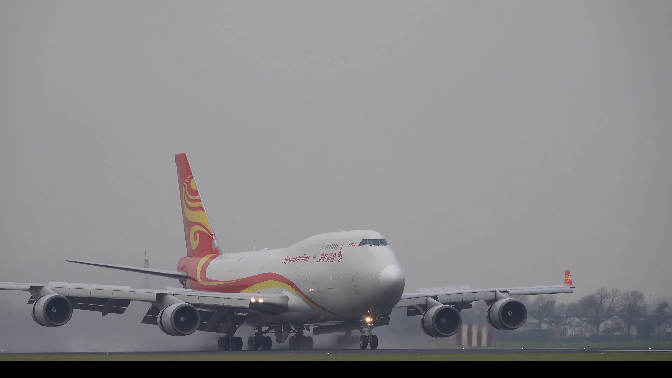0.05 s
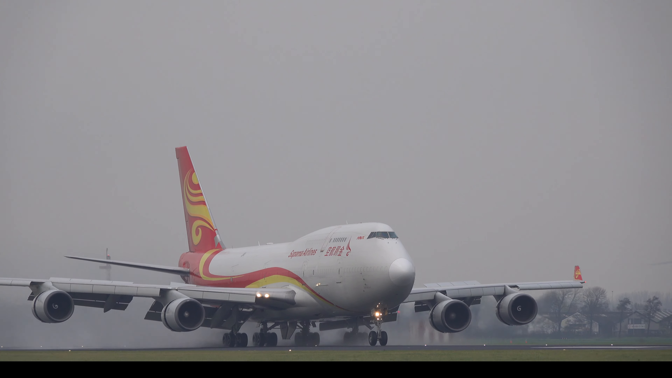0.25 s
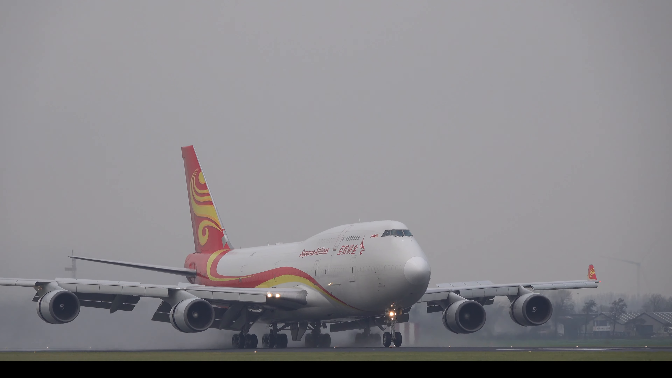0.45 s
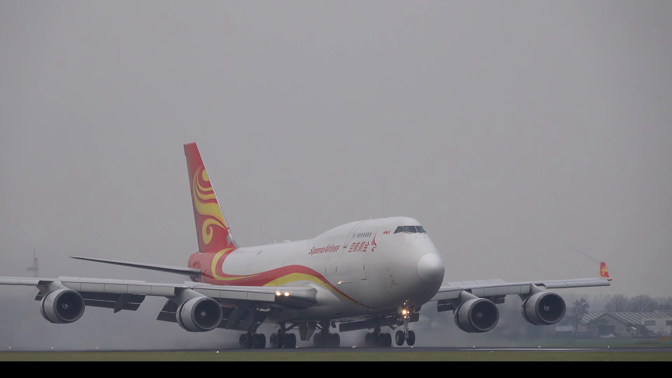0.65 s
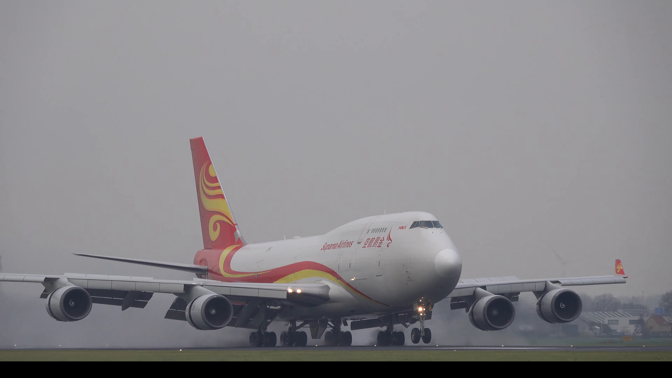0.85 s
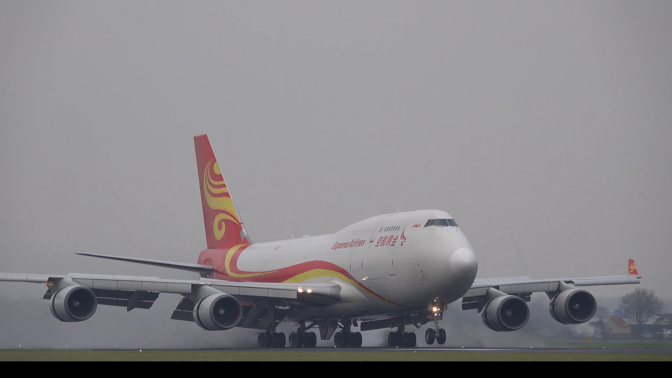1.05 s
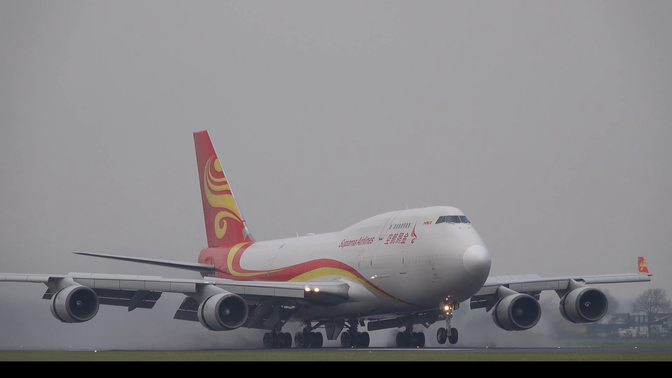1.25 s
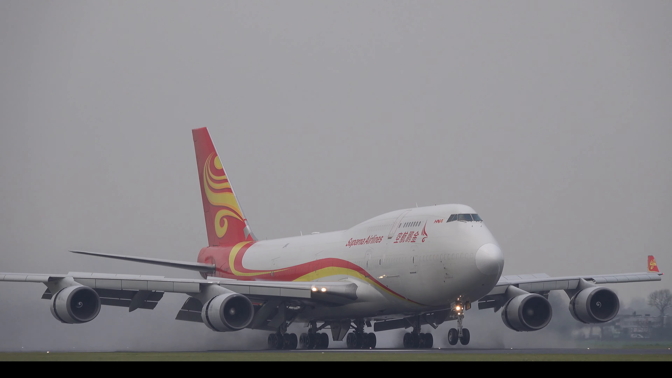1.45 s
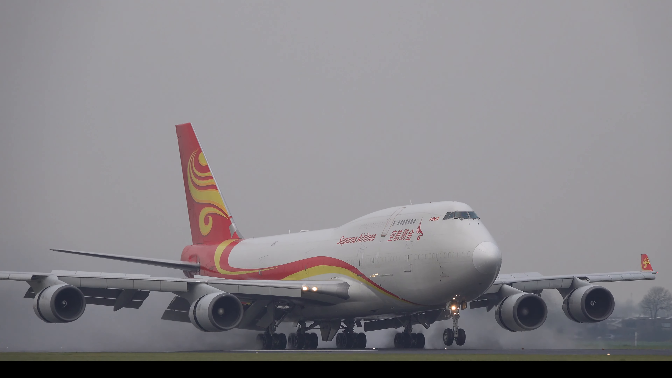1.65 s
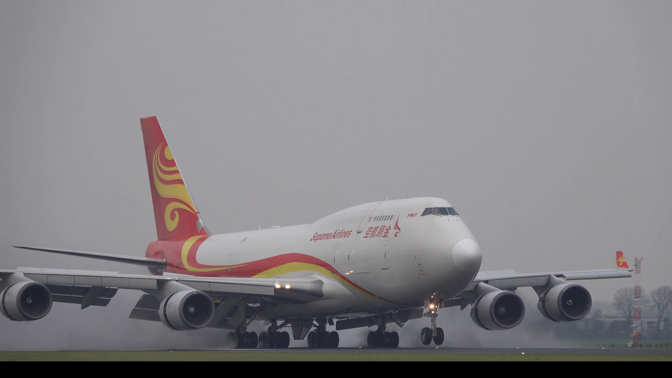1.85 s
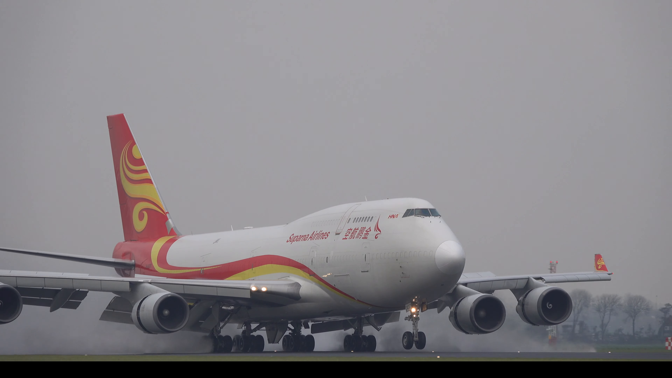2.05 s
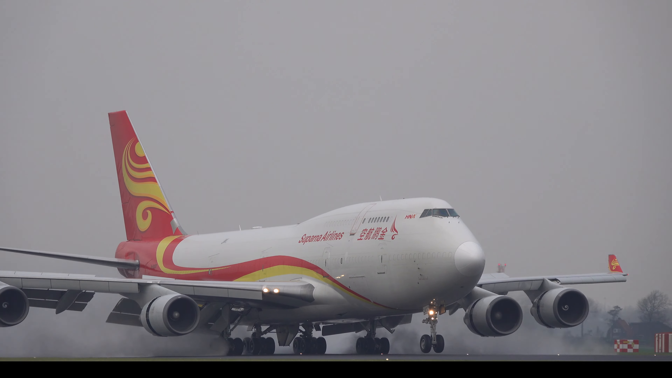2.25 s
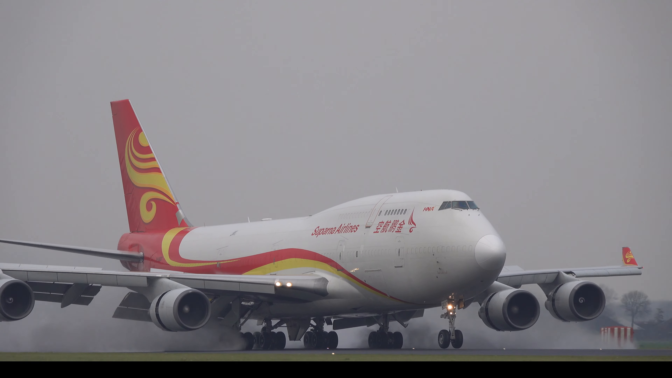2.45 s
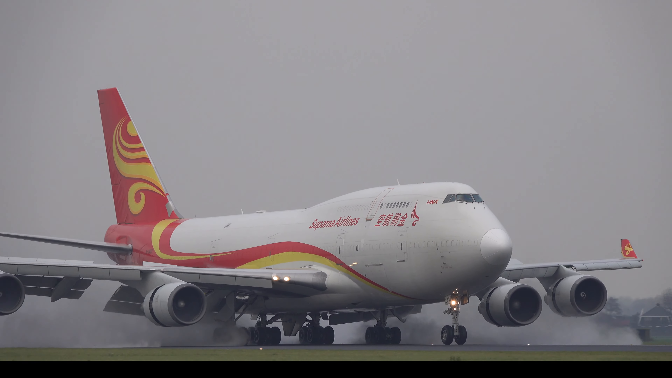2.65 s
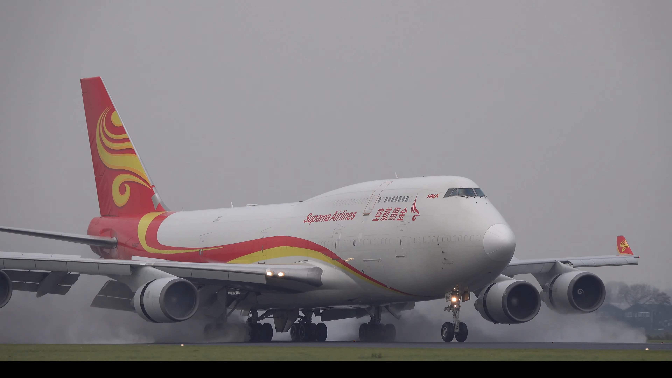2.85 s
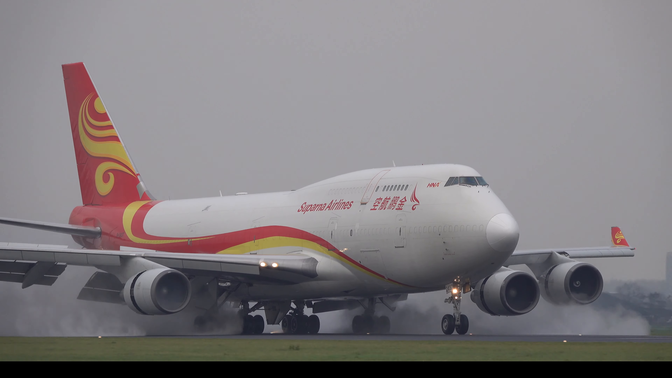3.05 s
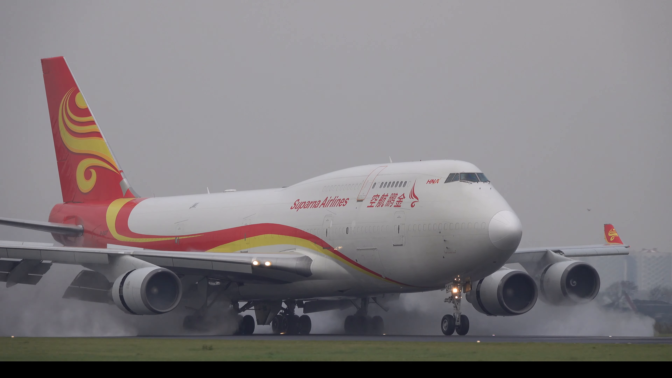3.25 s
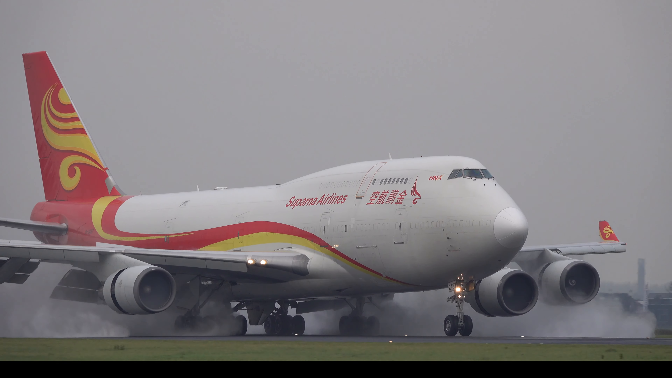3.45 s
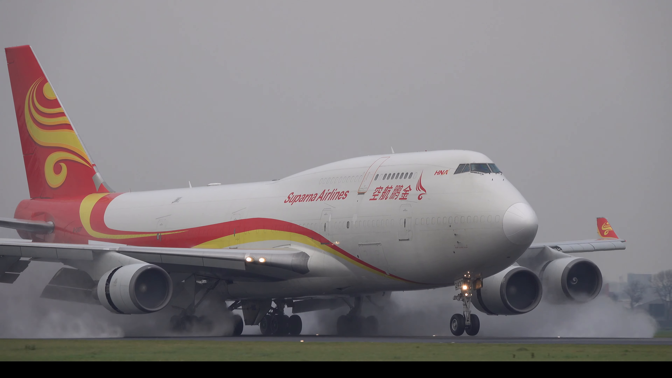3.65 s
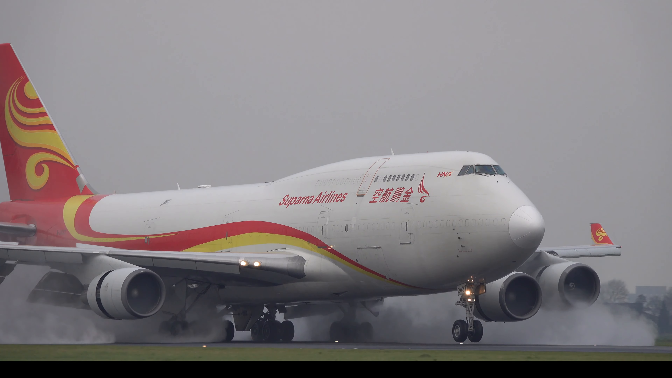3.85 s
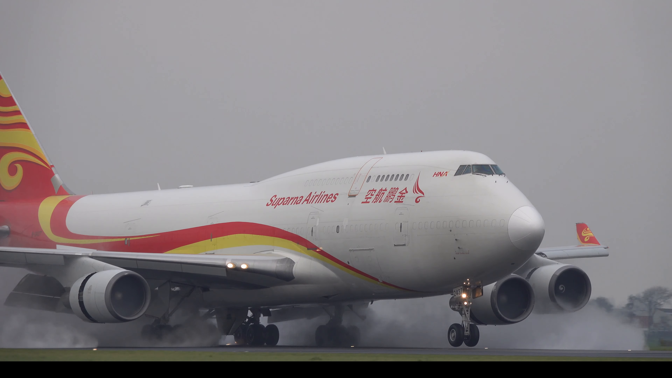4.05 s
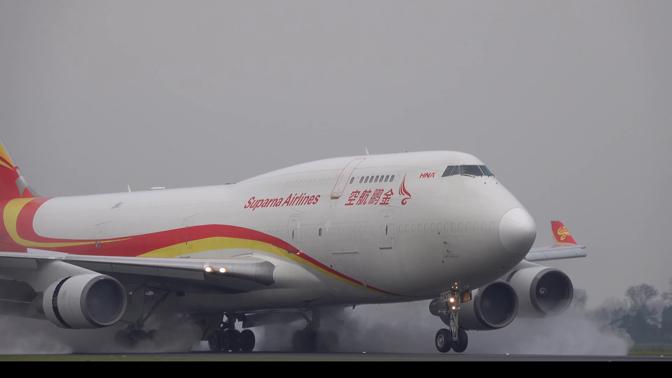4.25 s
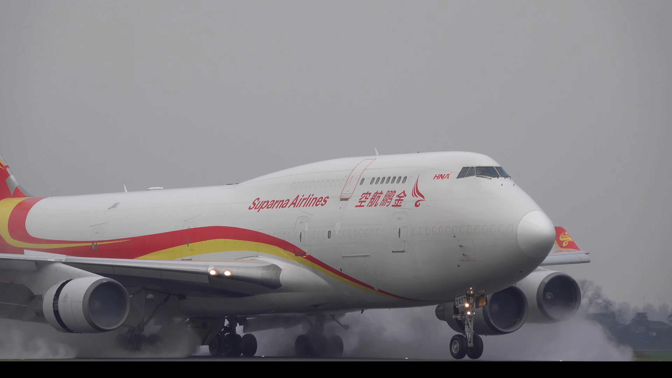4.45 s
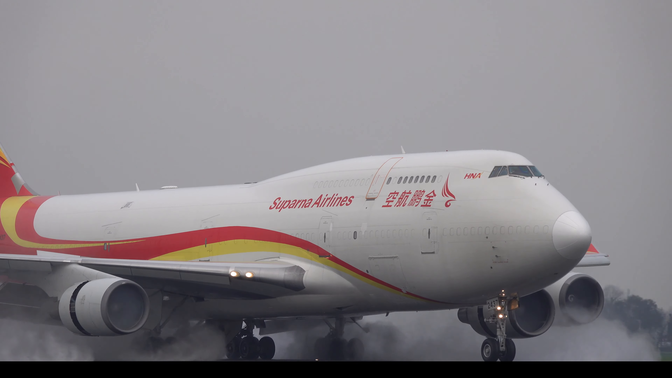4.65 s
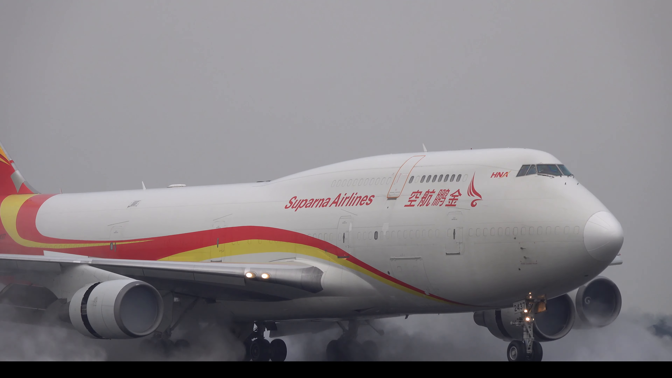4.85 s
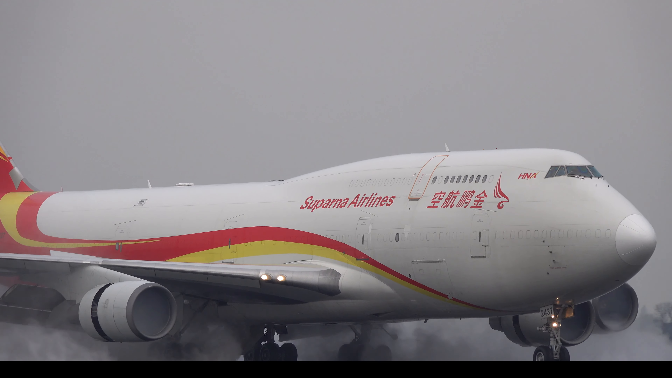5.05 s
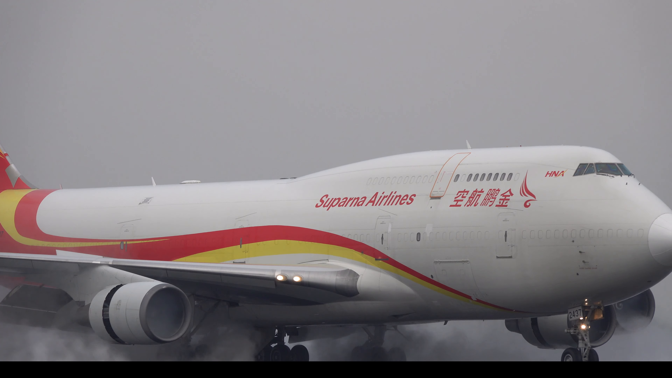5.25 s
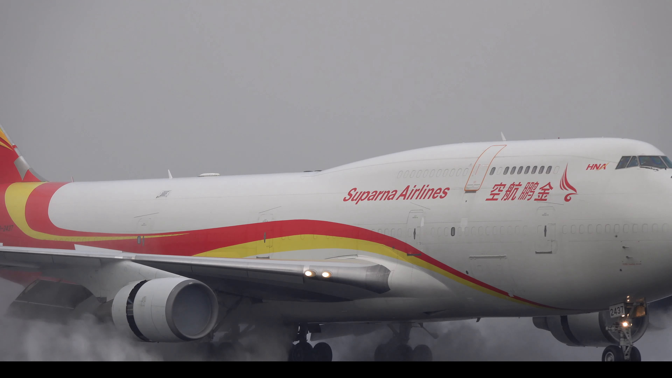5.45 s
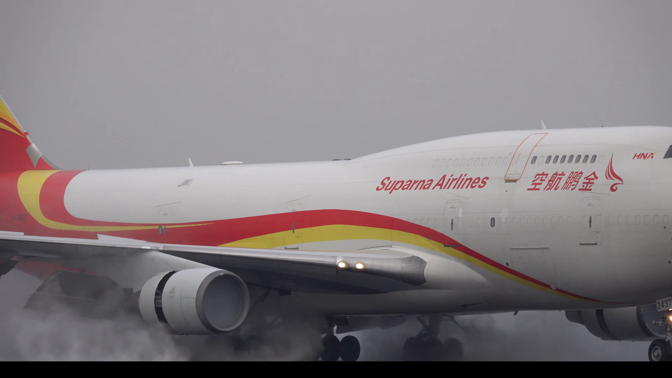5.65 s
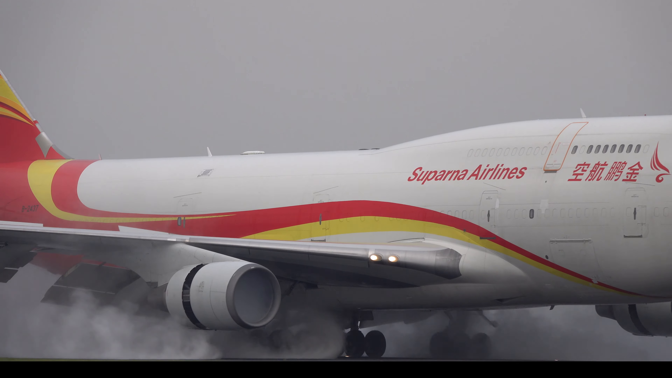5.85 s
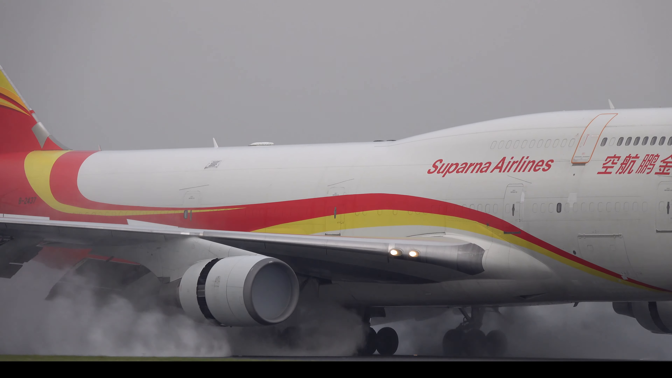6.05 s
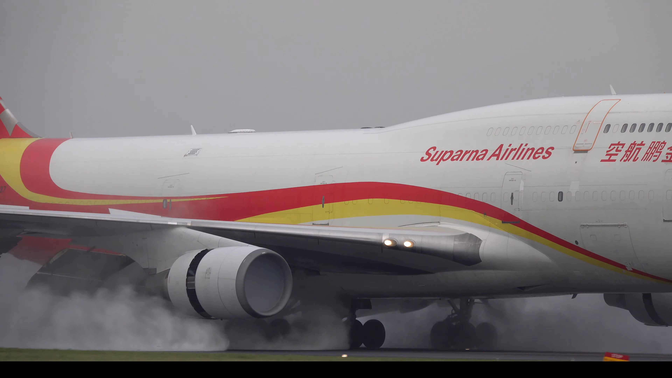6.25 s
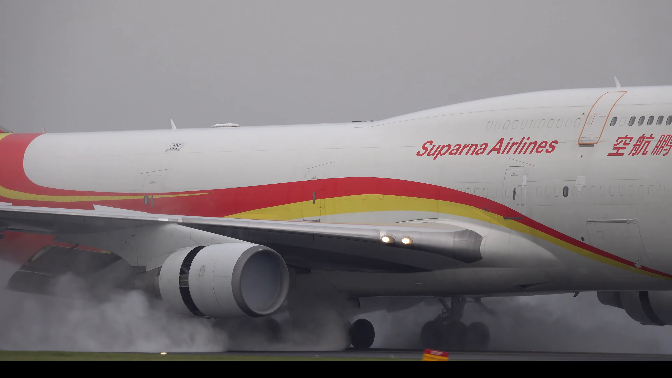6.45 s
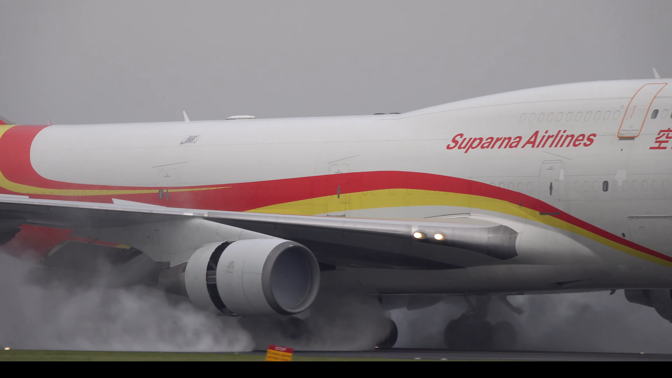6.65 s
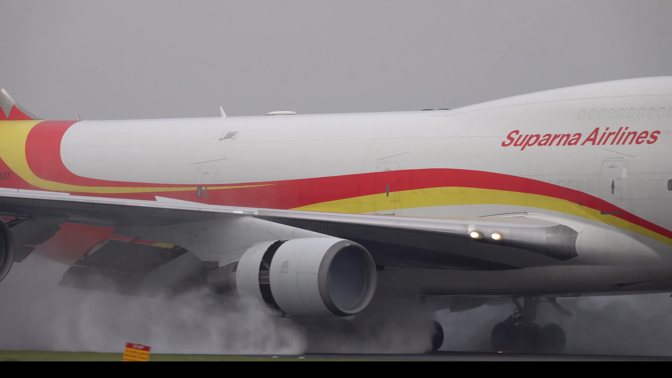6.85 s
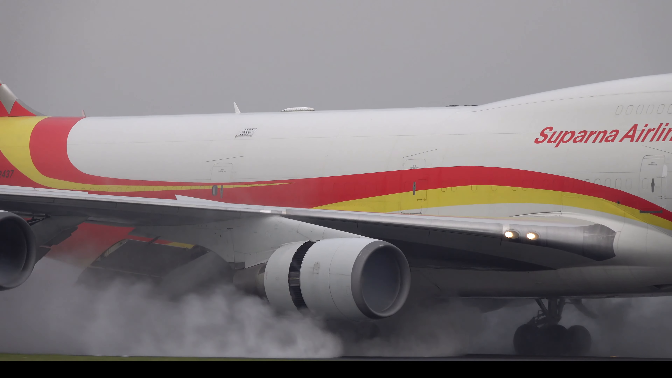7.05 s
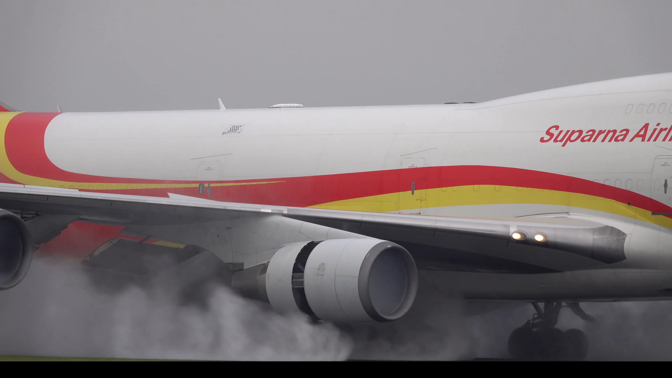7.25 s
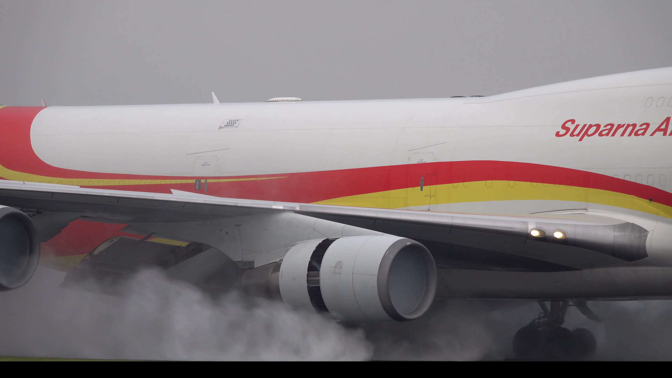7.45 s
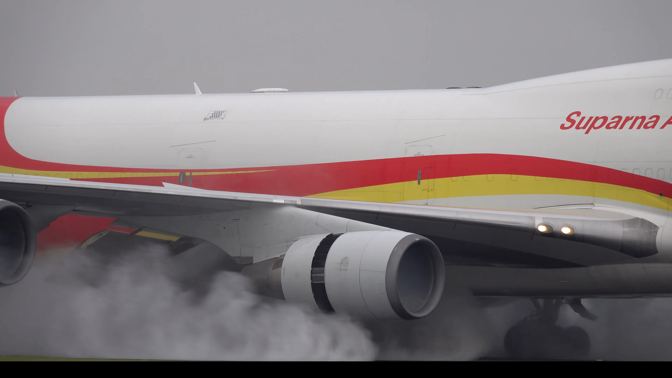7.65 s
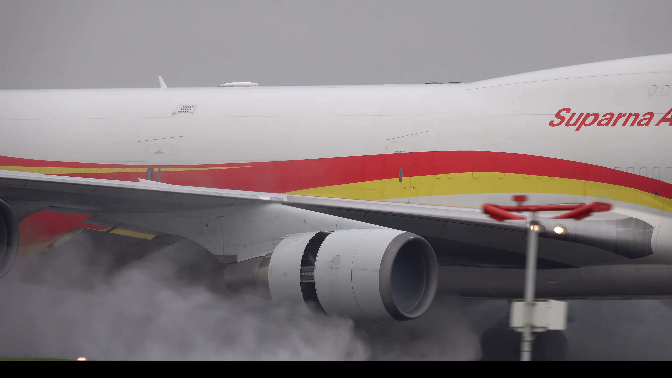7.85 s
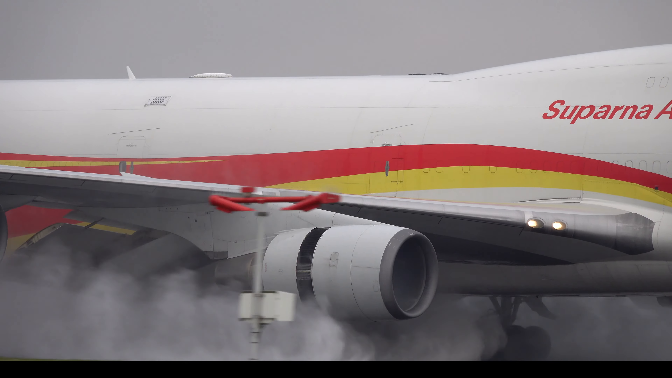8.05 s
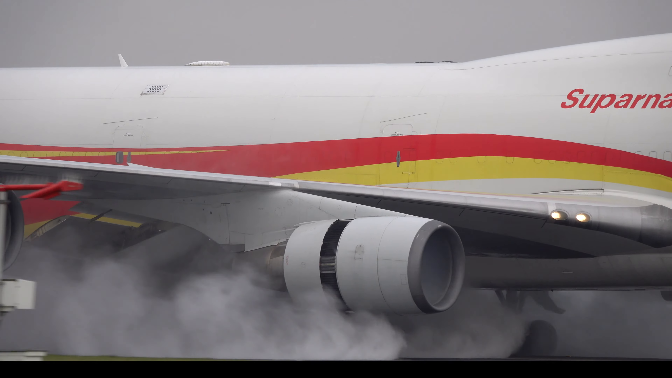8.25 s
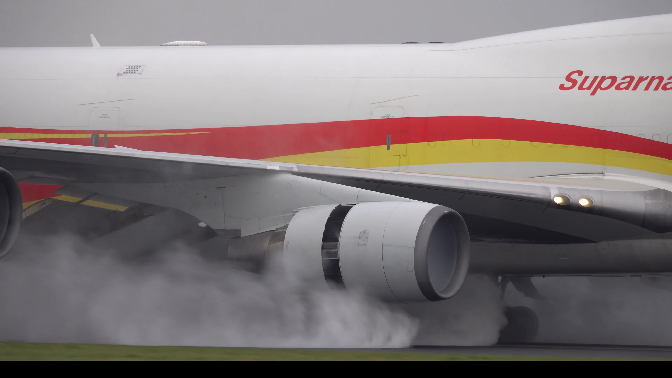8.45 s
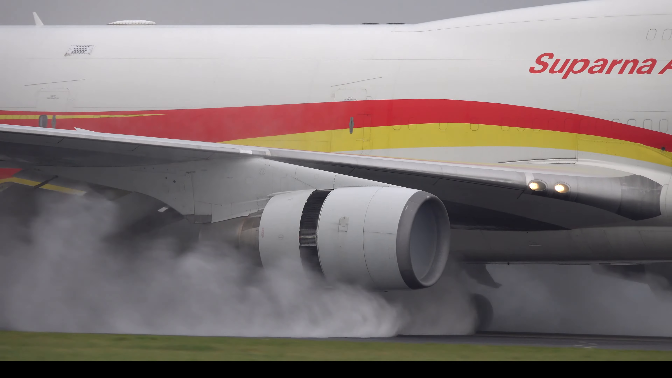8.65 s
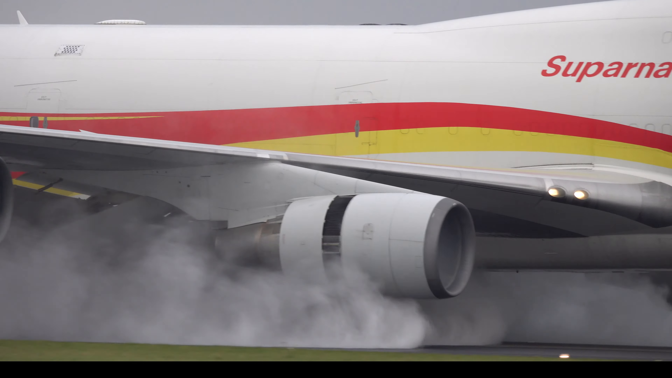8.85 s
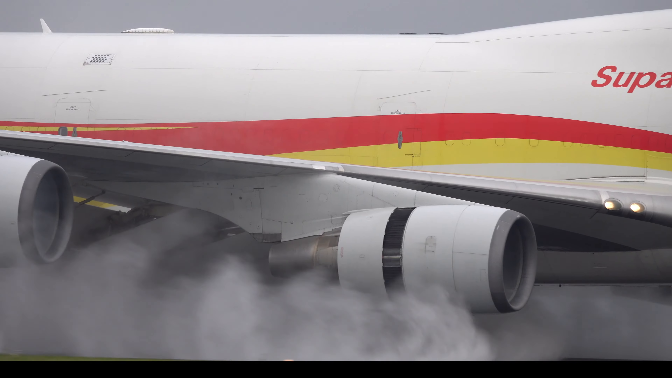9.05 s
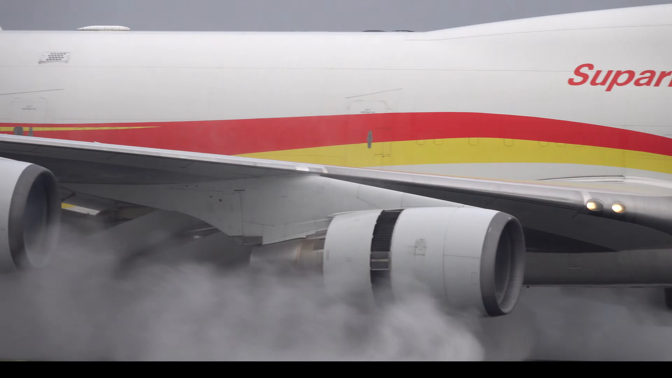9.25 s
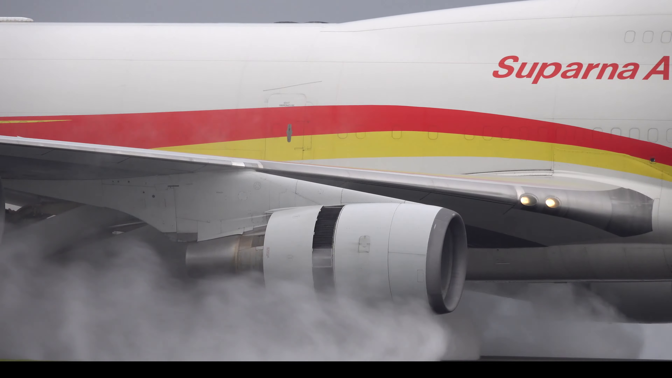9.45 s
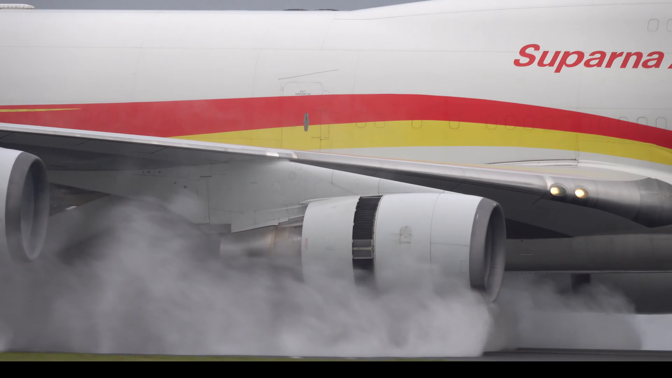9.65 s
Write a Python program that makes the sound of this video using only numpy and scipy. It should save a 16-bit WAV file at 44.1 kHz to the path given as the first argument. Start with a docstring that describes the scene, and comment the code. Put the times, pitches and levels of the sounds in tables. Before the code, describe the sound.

Open air by a wet runway, with wind striking the stereo microphone. From 0 to 2.8 seconds come short, uneven low buffets and fluttering gusts with brief lulls, a few faint ticks, and behind them a distant jet: airy hiss and fuzzy thin whistles, sagging in pitch. From about 1.8 the whines climb, growing clearer near 2.7 to 3. Wind becomes a steadier breeze after 3. A cluster of small, sharp, ringing ticks sounds close by at 3.3 to 3.45. A buzzy fan tone with overtones rises from 3.3, strongest around 3.9 to 4.3, still climbing until about 5. Then it roughens and sinks, its pitch slowly easing. The bright rush of air and spray swells strongly around 6.4, eases slightly near 7.5, then grows loudest and closest from 8.5 to 9.7, shimmering over low exhaust roar.

```python
"""A jet rolls in on a wet runway with reversers opening: its whines sag, climb, then blur into a rush.
The rush is shaped noise, louder and brighter as distance and air loss shrink; the roar is low noise.
Fans and turbines are tones with noise-scattered halos; a fizz of even noise fades with the distant rush.
Gusty wind, noise mostly separate at each port, buffets the microphone; ringing ticks sound close by."""
import sys
import numpy as np
from scipy import signal
from scipy.fft import rfft, irfft, next_fast_len
from scipy.io import wavfile
from scipy.ndimage import uniform_filter1d

SR = 44100
rng = np.random.default_rng(int(sys.argv[2]) if len(sys.argv) > 2 else 0)


def waveform_to_disk(signal):
    """Save audio, clipped to [-1, 1], as 16-bit WAV at the path in sys.argv[1]."""
    frames = np.transpose(np.atleast_2d(signal))
    scaled = np.clip(frames, -1, 1) * 32767
    samples = np.round(scaled).astype(np.int16)
    wavfile.write(sys.argv[1], SR, samples)


N = 428211
TIME = np.arange(N) / SR

# aircraft to microphone: (time [s], distance [m])
DISTANCE_M = [(0, 890), (.6, 700), (1, 582), (2, 480), (3.5, 359), (5, 286), (6.6, 208), (7.4, 173),
              (8.2, 137), (9, 96.6), (9.71, 82.5)]


def gain_of(db):
    """Decibels to amplitude."""
    return 10 ** (np.asarray(db) / 20)


def evened(x):
    """Scales to rms 1."""
    return x / np.sqrt(np.mean(x ** 2) + 1e-20)


def along(rows, t):
    """Columns of a time table, interpolated at t."""
    s, *columns = np.transpose(rows)
    return [np.interp(t, s, c) for c in columns]


def read(points, hz):
    """Spectrum table, interpolated over log frequency."""
    f, value = np.transpose(points)
    return np.interp(np.log(hz + 1), np.log(f + 1), value)


def bumps(rows):
    """Summed dB of bell-shaped rises and dips."""
    return sum(db * np.exp(-((TIME - s) / half) ** 2) for s, db, half in rows)


def wander(rate_hz):
    """Slow random motion of rms 1, low-passed near rate_hz."""
    step = 64
    count = N // step + 2
    hz = np.fft.rfftfreq(count, step / SR)
    slow = irfft(rfft(rng.standard_normal(count)) / (1 + (hz / rate_hz) ** 4), count)
    return np.interp(np.arange(N) / step, np.arange(count), evened(slow))


def noise_frames(likeness, size):
    """Short-time noise spectra at two ports of given likeness, with times (a column) and frequencies."""
    hop = size // 4
    t = np.arange(N // hop + 5)[:, None] * hop / SR
    hz = np.fft.rfftfreq(size, 1 / SR)
    a, b, c, d = rng.standard_normal((4, len(t), len(hz)))
    same = np.clip(read(likeness, hz), -1, 1)
    left = a + 1j * b
    right = same * left + np.sqrt(1 - same ** 2) * (c + 1j * d)
    return t, hz, np.array([left, right])


def to_sound(z, shape, hz, band):
    """Noise frames through a spectral shape scaled to even power within the band [Hz]."""
    size = 2 * (len(hz) - 1)
    inside = (hz > band[0]) & (hz < band[1])
    shape = shape / np.sqrt(np.sum(shape[..., inside] ** 2, -1, keepdims=True))
    frames = (z * shape).swapaxes(1, 2)
    return signal.istft(frames, nperseg=size, noverlap=size * 3 // 4)[1][:, :N]


def tone(hz, width_hz, steady):
    """Tone scattered by turbulence: a steady core plus a narrow halo that flutters but keeps its strength."""
    core = np.clip(steady, 0, 1)
    halo = wander(width_hz) + 1j * wander(width_hz)
    halo = halo * np.sqrt((1 - core ** 2) / uniform_filter1d(abs(halo) ** 2, size=3000))
    carrier = np.exp(2j * np.pi * np.cumsum(hz) / SR)
    return np.sqrt(2) * ((core + halo) * carrier).real


def absorbed(hz, metres, air_db_per_m_khz2=.0015):
    """Air absorption [dB] relative to a 100 m path, growing with the square of frequency."""
    return air_db_per_m_khz2 * (metres - 100) * (hz / 1000) ** 2


def ports(hz):
    """Left and right gain for sound from the aircraft."""
    # (frequency [Hz], left minus right [dB])
    balance_lr = [(500, 1), (2000, -0.2), (3000, 2), (4000, 4.5), (6000, 1), (8000, 4), (9500, 0),
                  (14000, 2)]
    lean_db = read(balance_lr, hz) / 2
    return gain_of(np.array([lean_db, -lean_db]))


def eddies(per_s, decay_s):
    """Pressure of a random train of small eddies, each striking fast and dying away; rms 1."""
    strikes = (rng.random(N) < per_s / SR) * rng.uniform(0.29, 1, N)
    t = np.arange(SR // 10) / SR
    pulse = np.exp(-t / decay_s) - np.exp(-t / decay_s * 10)
    power = signal.oaconvolve(strikes, pulse)[:N]
    return evened(np.sqrt(abs(power)))


def thumps(per_s=42, length_s=0.0057, spread_db=5):
    """Eddies shed one after another at uneven intervals, each a short push; rms 1."""
    gap, size = rng.uniform(-1, 1, (1000, 2)).T
    starts_s = np.cumsum(1 + .6 * gap) / per_s
    train = np.bincount((starts_s * SR).astype(int), gain_of(spread_db * size), N)[:N]
    age = np.arange(SR // 20) / SR / length_s
    return evened(signal.oaconvolve(train, age ** 2 * np.exp(-age ** 2))[:N])


def wind(brighten=1.64, lumpy_db=2.0, wind_db=-0.5, crackle=0.42, gusty=0.65, deepen=2.5):
    """Eddies hit the ports; harder hits reach higher and deeper. Fitful first, then a steadier breeze."""
    # wind force before trims: (time [s], level [dB])
    force_level = [(0, -52), (.7, -53), (1.2, -56), (2.4, -54), (3.2, -44.5), (4.4, -42.5), (5.3, -43),
                   (5.8, -48), (7.1, -43.5), (8.8, -42), (9.71, -53)]
    # lulls: (middle [s], depth [dB], 1/e half-width [s])
    lulls = [(.025, -21, 0.011), (.24, -10, .014), (.395, -7, 0.016), (.96, -25, 0.021), (1.04, -16, 0.035),
             (1.58, -37, .13), (1.93, -10, 0.061), (2.39, -11.5, .049), (5.82, -24, .055),
             (6.48, -30.5, 0.071)]
    # single buffets, replacing the force: (middle [s], level [dB], half length [s], extra treble [dB])
    buffets = [(0.05, -44, .008, -1), (0.109, -42.5, 0.013, -5), (0.138, -44, 0.0059, -3),
               (0.164, -42, 0.0057, 10), (0.192, -43, 0.0067, -1), (0.219, -46.5, .006, 0),
               (0.263, -43.5, 0.0073, -3), (0.293, -41.5, 0.0042, 7), (0.345, -41, .014, 6),
               (.368, -44, 0.011, 13), (0.436, -45, 0.0091, 13), (.466, -47.5, .006, -3),
               (0.536, -41, 0.017, 8), (0.575, -43, 0.011, 3), (0.6, -43, .006, -4),
               (0.629, -44.5, 0.0059, 1), (0.723, -42.5, .007, -2), (.744, -45.5, 0.0045, 6),
               (0.792, -43, 0.023, 9), (0.831, -43, 0.0058, 2), (0.917, -47, .007, -4),
               (.983, -44, 0.0038, 0), (1.116, -40, 0.0073, -11), (1.25, -46, 0.0117, 3),
               (1.296, -50, 0.0057, -2), (1.41, -54.5, 0.011, -16), (1.783, -48, 0.0098, -3),
               (1.855, -51.5, .012, -3.5), (2.068, -43, 0.0173, 11), (2.106, -44, 0.02, 8),
               (2.27, -46, 0.022, -6.5), (2.336, -45, .011, -5), (2.458, -46.5, 0.02, 9),
               (2.56, -43, 0.012, -4), (2.721, -41, .025, -8)]
    # base spectrum: (frequency [Hz], relative density [dB])
    spectrum = [(30, -17.5), (70, -17), (170, -8), (250, -11), (340, 6), (480, -4.5), (650, 7),
                (1000, -3.5), (1800, -0.5), (3000, -14), (4200, -29), (5500, -43), (9000, -92)]
    # likeness of left and right: (frequency [Hz], correlation [0-1])
    likeness = [(150, 0.94), (350, 0.54), (600, 0.31), (1500, 0.1)]
    # eddy size, as weight of the low thud: (time [s], gain [dB])
    thud_level = [(0, 6), (1.3, 10.5), (2.8, 8), (4, 2.5), (6, 2), (7.5, 2.5), (9.71, 1)]

    unrest = np.interp(TIME, [2.4, 3.2], [1, .25])
    force = gain_of(along(force_level, TIME)[0] + bumps(lulls))
    force = force * gain_of(lumpy_db * unrest * wander(28) + 2.5)
    force = force * (1 + gusty * unrest * (thumps() - .85))

    edge_s = .002
    treble_db = np.zeros(N)
    for s, db, half_s, extra_db in buffets:
        blowing = (1 + np.tanh((half_s - abs(TIME - s)) / edge_s)) / 2
        force = force + blowing * (gain_of(db) - force)
        treble_db += extra_db * blowing

    t, hz, z = noise_frames(likeness, size=512)
    force_db = np.interp(t, TIME, 20 * np.log10(force))
    octaves_up = np.log2(np.maximum(hz / 650, 1))
    reach_db = brighten * np.minimum(force_db + 41.5, 4) * octaves_up
    reach_db = reach_db + np.interp(t, TIME, treble_db) * hz ** 2 / (hz ** 2 + 1000 ** 2)
    deep_db = deepen * np.clip(force_db + 39, 0, 4) * np.interp(t, TIME, unrest)
    reach_db = reach_db + deep_db / (1 + (hz / 220) ** 4)
    sound = to_sound(z, gain_of(read(spectrum, hz) + reach_db), hz, (250, 1100))

    thud_band = signal.butter(2, [170, 480], "bandpass", fs=SR, output="sos")
    thud = signal.sosfiltfilt(thud_band, sound)
    sound = sound + thud * (gain_of(along(thud_level, TIME)[0]) - 1)

    flutter = 1 + crackle * (np.array([eddies(260, 0.0019), eddies(260, 0.0025)]) - 1)
    flutter = flutter * (1 + .5 * (unrest - .25) * (eddies(220, .0016) - .8))
    return sound * force * flutter * gain_of(wind_db)


def ticks():
    """Small ticks close to the microphone: each rings a few short modes, with a rounded start."""
    # (time [s], level [dB], place [-1 right to 1 left])
    strikes = [(0.166, -40, .4), (.439, -41, .5), (0.465, -38, -0.36), (0.57, -37, -.5), (3.307, -27, .3),
               (3.328, -25, -0.68), (3.363, -27, 0.35), (3.378, -32, .5), (3.409, -29, -0.73),
               (3.44, -33, .5), (3.452, -21.5, .5)]
    # (frequency [Hz], level [dB], t60 [s])
    modes = [(1630, -2, 0.0067), (2170, 0, 0.0099), (2900, -28.5, .005), (3900, -29, .003)]
    out = np.zeros((2, N))
    t = np.arange(SR // 40) / SR
    ring = sum(gain_of(db - 60 * t / t60) * np.sin(2 * np.pi * hz * t) for hz, db, t60 in modes)
    ring = signal.sosfilt(signal.butter(6, 4500, fs=SR, output="sos"), ring)
    for s, db, place in strikes:
        start = round(s * SR)
        out[:, start:start + len(t)] += gain_of(db) * np.outer([1 + place, 1 - place], ring)
    return out


def roar(trim_db=5.5, unrest_db=1.2):
    """Deep exhaust noise, most alike at the two ports in the bass."""
    # before trim: (time [s], level [dB])
    level = [(0, -57), (.15, -58.5), (1.4, -61), (1.66, -67), (1.8, -61), (2.2, -57), (2.7, -55),
             (3.95, -56.5), (5.5, -58), (6.9, -52), (7.4, -57.5), (8.9, -55), (9.71, -59)]
    # (frequency [Hz], relative density [dB])
    spectrum = [(20, -4.5), (40, -12.5), (60, -17.5), (95, 2), (120, -8), (175, 4.5), (250, -10),
                (350, -6.5), (480, -14), (650, -15.5), (1000, -43.5), (2500, -61)]
    t, hz, z = noise_frames([(50, 1.0), (400, 0.74)], size=2048)
    sound = to_sound(z, gain_of(read(spectrum, hz)), hz, (60, 200))
    return sound * gain_of(along(level, TIME)[0] + trim_db + unrest_db * wander(11.0))


def fizz():
    """Faint flat-spectrum hiss that rises and fades with the distant rush."""
    # (time [s], level against the rush [dB])
    level = [(.8, -34), (1.1, -30), (1.75, -26.5), (3, -35), (3.5, -53), (5, -51)]
    t, hz, z = noise_frames([(8000, 0.45)], size=512)
    sound = to_sound(z, np.ones(len(hz)), hz, (0, SR / 2))
    return sound * gain_of(along(level, TIME)[0])


def whines():
    """Fuzzy turbine whistles that sag at idle and climb as the engines spool up."""
    # each: (time [s], pitch [Hz], level against the rush [dB])
    high = [(0, 6070, -35), (.4, 6000, -31), (.9, 5940, -30), (1.4, 5880, -24.5), (1.9, 5910, -23),
            (2.3, 6150, -34), (2.7, 6400, -35)]
    low = [(0, 4620, -16), (.4, 4600, -15), (.9, 4520, -20.5), (1.5, 4400, -18), (1.9, 4480, -23),
           (2.3, 4640, -19), (3, 5260, -16), (3.5, 5900, -26)]
    spooling = [(1.8, 3190, -28), (2.45, 3484, -21), (2.701, 3680, -11), (3.03, 4100, -9.5),
                (3.15, 4100, -23), (3.5, 5030, -22)]
    # sinks and dies at idle, same columns: (time [s], pitch [Hz], level against the rush [dB])
    idling = [(0, 2980, -3), (.15, 2910, -10), (.4, 2880, -13), (.7, 2800, -18)]
    out = np.zeros((2, N))
    for rows, width_hz in ((high, 85), (low, 210), (spooling, 180), (idling, 140)):
        hz, db = along(rows, TIME)
        inside_s = np.minimum(TIME - rows[0][0] + 0.073, rows[-1][0] - TIME)
        sounding = np.clip(inside_s * 10, 0, 1)
        out += ports(hz) * gain_of(db) * tone(hz, width_hz, steady=0) * sounding
    return out


def fan(width_hz=32, waver=0.00403, flutter_db=1.5, breakup_db=2, skirt_width_hz=120, skirt_db=-6,
        overtone_flutter_db=3.3):
    """Blade passing tone and overtones; they blur, break up and sink at full reverse power."""
    # leading fan spools up, then sinks: (time [s], blade passing rate [Hz])
    blade_rate = [(3.25, 1602), (3.55, 1788), (4.0, 1960), (4.6, 2243), (5.25, 2280), (5.8, 2256),
                  (6.6, 2252), (7.3, 2190), (8.5, 2148), (9.71, 2036)]
    # (time [s], level against the rush [dB])
    tone_level = [(3.15, -14), (3.28, -1), (3.45, -7), (3.6, -2), (3.72, 0.5), (3.86, 6), (3.96, 8),
                  (4.05, 8.5), (4.11, 1), (4.21, 8), (4.32, 2.5), (4.46, 5.5), (4.51, 0), (4.64, 2),
                  (4.75, -12), (5.1, -8), (5.38, -5), (5.55, -3.5), (5.72, 0), (6.1, -5), (6.25, -2),
                  (6.5, -6), (6.7, -5), (6.95, -5.5), (7.4, -4), (7.9, -1.5), (8.2, -3), (8.37, 0),
                  (8.5, -5), (8.8, -3.5), (9.15, -3.5), (9.35, -7), (9.55, -0.5), (9.71, -11)]
    # multiples 1 to 5 of the blade rate: relative level [dB]
    order_levels = [-3.5, -10.5, -12, -28.5, -33]
    # other engines, beating with the leading one: (speed ratio [1], relative level [dB])
    other_engines = [(.987, -10.5), (1.018, -12.5)]

    rate_hz = along(blade_rate, TIME)[0] * (1 + waver * wander(14.8))
    reversing = np.interp(TIME, [4.1, 5], [0, 1])
    level_db = along(tone_level, TIME)[0] + flutter_db * wander(9)
    level_db = level_db + reversing * breakup_db * (wander(40) - .4)
    metres, = along(DISTANCE_M, TIME)
    overtone_db = np.interp(TIME, [3.55, 3.82, 3.97, 4.45, 4.9], [8, -1.0, 1, -7.0, -12])
    joining_db = np.interp(TIME, [3.6, 3.85], [-6, 0])  # the other fans come up a little later
    steady = .75 - .7 * reversing
    out = np.zeros((2, N))
    for k, order_db in enumerate(order_levels, 1):
        hz = k * rate_hz
        loss_db = absorbed(hz, metres) - absorbed(rate_hz, metres)
        blades = tone(hz, k * width_hz, steady)
        blades += gain_of(skirt_db) * tone(hz, k * skirt_width_hz, steady=0)
        for ratio, engine_db in other_engines:
            blades += gain_of(engine_db + joining_db) * tone(hz * ratio, k * width_hz, steady / k)
        broken_db = (k > 1) * (overtone_db + overtone_flutter_db * (wander(30) - .4))
        out += ports(hz) * gain_of(level_db + order_db - loss_db + broken_db) * blades
    return out


def rush(patchy_db=0.61, ground_db=7, ground_hz=1700, ground_creep=0.58, veil_db=7, veil_hz=7000):
    """Turbulent air and spray; from afar the air takes its treble and the grass its lower middle."""
    # before distance effects: (frequency [Hz], relative density [dB])
    spectrum = [(100, -40), (400, -24.5), (700, -13.5), (1000, -18.5), (1400, -6.5), (2100, 1),
                (2800, -0.5), (3800, -4), (6000, -5), (7500, -12), (9200, -17.5), (11000, -27),
                (13500, -38.5), (15500, -57)]
    # narrow resonances, before scaling with distance: (centre [Hz], full 1/e width [Hz], gain [dB])
    resonances = [(1510, 130, 0), (2640, 310, 1.5), (3500, 113, 5), (3680, 140, -3.5), (4100, 210, 3),
                  (4690, 260, 3), (4970, 120, -3), (5257, 250, 2.5), (5880, 250, 0.5), (7300, 140, -0.5),
                  (7400, 160, 0.5), (7840, 200, -1), (8530, 200, 0.5), (9240, 180, 2.5), (10100, 180, 4),
                  (10700, 220, 3)]
    # likeness of left and right: (frequency [Hz], correlation [0-1])
    likeness = [(900, 1), (2000, 0.96), (4000, 0.88), (8000, 0.94), (14000, 1)]

    t, hz, z = noise_frames(likeness, size=512)
    metres, = along(DISTANCE_M, t)
    patches = uniform_filter1d(rng.standard_normal(z.shape[1:]), size=14, axis=0)
    patches = evened(uniform_filter1d(patches, size=12, axis=1))
    colour_db = sum(db * np.exp(-((hz - centre) / width * 2) ** 2) for centre, width, db in resonances)
    colour_db = colour_db * np.interp(metres, [100, 180], [1.3, .7])  # stands out more from close by
    # from afar the top treble is lost
    veiled_db = veil_db * np.interp(metres, [250, 450], [0, 1]) / (1 + (veil_hz / (hz + 1)) ** 16)
    ground_edge = hz / ground_hz / (metres / 450) ** ground_creep
    grazing_db = ground_db * np.log10(metres / 100) / (1 + ground_edge ** 4)
    shape_db = read(spectrum, hz) + colour_db - absorbed(hz, metres)
    shape_db = shape_db - grazing_db - veiled_db + patchy_db * patches
    return to_sound(z * ports(hz)[:, None], gain_of(shape_db), hz, (2400, 3800))


def dips(fall_s=0.003):
    """Summed dB of abrupt drops that creep back."""
    # (time [s], nominal depth [dB], recovery [s])
    drops = [(.355, -6, 0.037), (.435, -8, 0.037), (.55, -2, .025), (.795, -4.5, .06), (2.11, -7.5, 0.058),
             (2.79, -3.5, 0.073), (3.08, -5.5, 0.052), (3.375, -6.5, 0.034), (3.885, -7, 0.032),
             (4.6, -9, 0.0263), (4.761, -8, 0.03), (5.37, -2.5, 0.032), (5.66, -1.5, 0.048),
             (6.254, -6, 0.13), (6.755, -6, 0.02), (6.945, -5, 0.042), (8.302, -6.5, 0.022)]
    total_db = np.zeros(N)
    for s, db, recovery_s in drops:
        age_s = np.maximum(TIME - s, 0)
        total_db += db * (1 - np.exp(-age_s / fall_s)) * np.exp(-(age_s / recovery_s) ** 2)
    return total_db


def arrival(far_shimmer_db=0.77, near_shimmer_db=0.93, level_100m_db=-28.5, spread_db_per_decade=20):
    """Gain on the aircraft's sound: spreading and swells along the path, a shimmer whose depth follows
    distance, and brief abrupt dips in level."""
    # moving air bends sound towards or away from the microphone: (middle [s], gain [dB], 1/e half-width [s])
    swells = [(0.42, -4.5, 0.52), (1.2, 0.5, 0.18), (1.66, 0.5, 0.081), (1.95, 1, 0.096),
              (2.55, 1.2, 0.067), (3.02, 3.5, 0.13), (3.35, -2, 0.35), (3.84, 3.5, 0.071),
              (3.97, 3.5, 0.026), (4.12, -2, 0.043), (4.57, 1.5, 0.017), (5.6, -1.5, 0.18),
              (6.08, -0.5, .1), (6.42, 8, 1.14), (6.5, 0.9, 0.11), (6.82, 0.7, 0.054), (6.91, -0.5, 0.039),
              (7.48, -5, 0.4), (8.14, -2.5, 0.044), (8.42, -3, 0.1), (8.69, 2.5, 0.049), (8.8, -1.5, 0.043),
              (9.1, 2, .05), (9.25, 1.5, 0.083), (9.37, -1, 0.036), (9.53, 3.5, 0.38)]
    metres, = along(DISTANCE_M, TIME)
    shimmer_db = np.interp(metres, [100, 400], [near_shimmer_db, far_shimmer_db])
    path_db = level_100m_db - spread_db_per_decade * np.log10(metres / 100)
    return gain_of(path_db + bumps(swells) + dips() + shimmer_db * wander(37))


def scene(hiss_db=-80):
    """The aircraft comes nearer and drifts to the left; wind and a faint hiss lie over it."""
    lean_db = np.interp(TIME, [0, 8, 9.7], [-.4, -.1, .3])
    aircraft = (rush() + fizz() + fan() + whines()) * arrival()
    aircraft = aircraft * gain_of(np.array([lean_db, -lean_db]))
    hiss = gain_of(hiss_db) * rng.standard_normal((2, N))
    return aircraft + roar() + wind() + ticks() + hiss


def record(dry, edge_hz=15300):
    """The two ports shift the sound apart in phase; then a low-pass limits the band."""
    # (frequency [Hz], lead of left over right [rad])
    port_lead = [(170, 0.079), (350, 0.67), (560, 0.7), (800, 0.96), (1400, 0.083), (2000, 0), (3150, 0.54),
                 (4200, 0.023), (5400, 0.14), (6900, 0.59), (8300, .12), (10700, 0), (14600, 0.49)]
    size = next_fast_len(N + 4096)
    lead = read(port_lead, np.fft.rfftfreq(size, 1 / SR)) / 2
    turned = rfft(dry, size) * np.exp(1j * np.array([lead, -lead]))
    heard = irfft(turned, size)[:, :N]
    lowpass = signal.firwin(511, edge_hz, window=("kaiser", 9), fs=SR)
    return signal.oaconvolve(heard, lowpass[None], "same")


dry = scene()
out = record(dry)
waveform_to_disk(out)
```